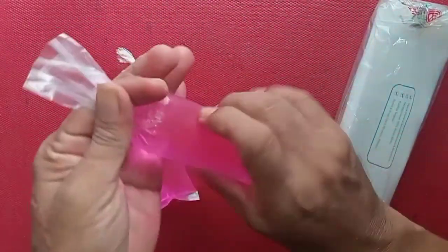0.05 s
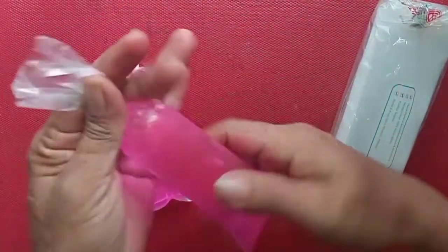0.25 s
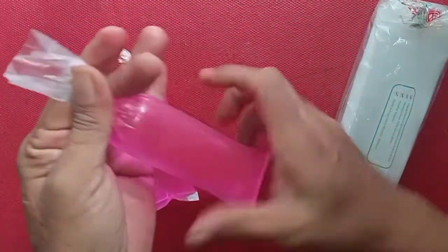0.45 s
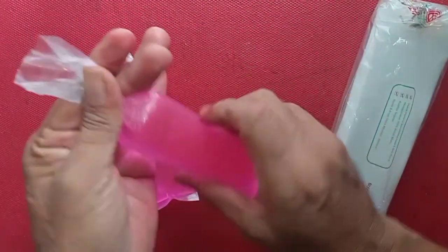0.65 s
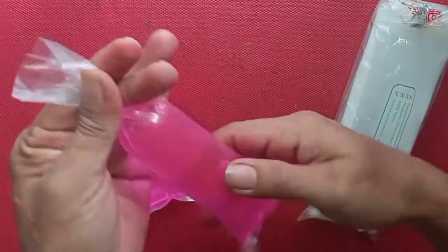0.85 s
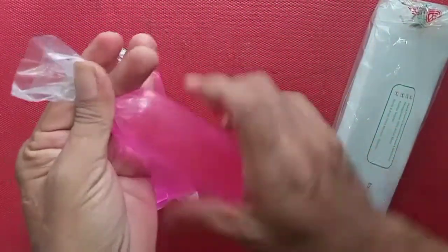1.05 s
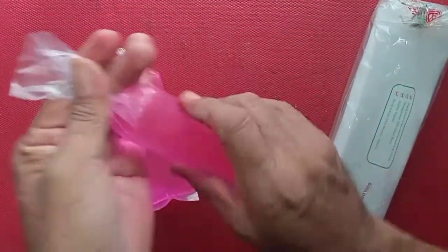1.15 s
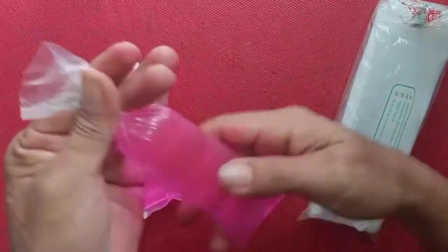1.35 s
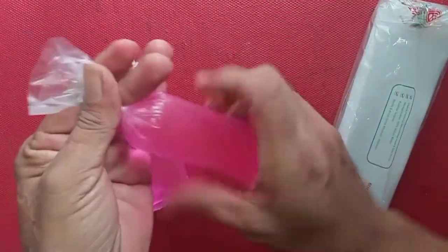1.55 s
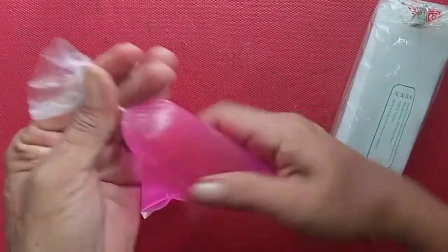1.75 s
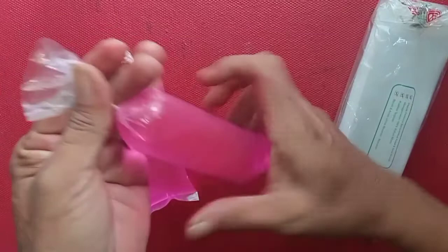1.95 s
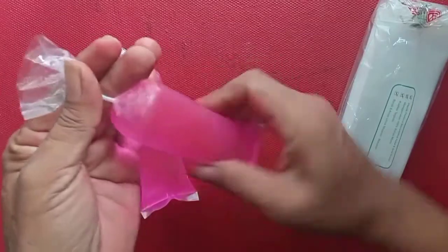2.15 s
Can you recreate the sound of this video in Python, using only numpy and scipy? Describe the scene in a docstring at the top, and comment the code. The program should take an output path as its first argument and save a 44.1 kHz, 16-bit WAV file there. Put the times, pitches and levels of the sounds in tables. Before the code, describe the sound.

Fingers squeak on a small plastic bag of liquid, close by. Five short, high, falling chirps come at about 0.2, 0.7, 1.0, 1.2 and 1.5 seconds. Quieter bubble blips, light plastic ticks and a soft rustle run between them, with blips and ticks bunching from about 1.7 to 2 seconds. Underneath is the faint hum and hiss of a quiet room.

```python
"""A hand squeezes and strokes a small plastic bag of liquid, close by in a quiet room with hum and hiss.
At first a faint ring dies away, the film ticks and bubbles blip as air pockets resonate in the liquid.
From 0.2 to 1.5 s come five short falling chirps, probably fingers in stick-slip on the taut film,
which slightly overload the input. Bubbles, ticks and a soft rustle go on between them and to the end."""
import sys
import numpy as np
from scipy import signal
from scipy.fft import rfft, irfft
from scipy.io import wavfile

SR = 44100
rng = np.random.default_rng(int(sys.argv[2]) if len(sys.argv) > 2 else 0)


def file_out(sig):
    """Save sig as 16-bit WAV at sys.argv[1]."""
    # one column per channel
    cols = np.atleast_2d(sig).T
    # limit, then scale
    lim = np.clip(cols, -1, 1)
    pcm = np.round(lim * 32767).astype(np.int16)
    wavfile.write(sys.argv[1], SR, pcm)


N = 97020

# Spectrum of the film's snaps and clicks. Each row: frequency in Hz, relative density in dB.
SNAP_SPECTRUM = [(60, -6), (400, -12), (1200, 8), (4500, 3.5), (9000, 2.5), (16000, -8.5)]


def squeaks():
    """Stick-slip friction: slips are short, high and rough at first, then longer, lower and purer."""
    # Each row: start in seconds, length in seconds, level in dB, settled pitch in Hz,
    # fall time in seconds, lowest pitch as a ratio of the settled one.
    strokes = [(0.2026, .043, -19.5, 1811, .026, 1), (0.689, .044, -21, 1779, 0.01913, .94),
               (1.0176, 0.048, -20.5, 1782, .020, 0.91), (1.155, 0.049, -21.5, 1744, 0.0159, 0.92),
               (1.461, 0.052, -20.5, 1864, 0.021, 0.84)]
    # An earlier squeak still dying away: pitch in Hz, level in dB, 60 dB decay time in seconds.
    opening_ring = (1905, -44, 0.2)
    attack_s, release_s = 0.0055, 0.009
    start_ratio, high_ratio, drop_s, settle_s = 1.2, 1.12, 0.00588, 0.009
    first_slip_s, last_slip_s, slowing_s, slip_jitter = 0.0035, 0.013, 0.03, 0.241
    swell_share, pitch_scatter = 0.58, 0.022
    rough_start, rough_held, rough_s, rough_hz = 0.38, 0.05, 0.032, 540  # the grip chatters at first
    ring_db, rub_db = -22.5, -34.5  # relative to the squeak
    radiating_band_hz = [1373, 3130]
    t = np.arange(SR // 8) / SR
    out, pressure = np.zeros((2, N))
    rub = crackle(per_s=2800)
    for start, length, db, hz, fall, dip in strokes:
        rough_sin, rough_cos, drift = (wander(r)[:len(t)] for r in (rough_hz, rough_hz, 1 / last_slip_s))
        slip_s = np.interp(t, [0, slowing_s], [first_slip_s, last_slip_s]) * np.exp(slip_jitter * drift)
        slip, within = np.divmod(np.cumsum(1 / slip_s) / SR, 1)
        detune, phase_jump = rng.standard_normal((2, len(t)))[:, slip.astype(int)]  # one draw a slip
        swell = np.sin(np.pi / 2 * np.minimum(within, 1 - within) / swell_share)
        ratio = np.interp(t, [0, fall - drop_s, fall, fall + settle_s], [start_ratio, high_ratio, dip, 1])
        phase = 2 * np.pi * np.cumsum(hz * ratio * (1 + pitch_scatter * detune)) / SR + phase_jump
        roughness = rough_held + (rough_start - rough_held) * np.exp(-(t / rough_s) ** 2)
        chatter = roughness * (rough_sin * np.sin(phase) + rough_cos * np.cos(phase)) / 2
        level = amp(db) * np.minimum(t / attack_s, 1) * np.exp(-np.maximum(t - length, 0) / release_s)
        add(out, start, level * (swell * np.sin(phase) + chatter))
        add(pressure, start, level)
        tail = ring(hz, t60=0.36)  # the bag rings on at the settled pitch
        waver = unit_rms(1 + wander(hz=45))[:len(tail)]
        add(out, start + length, amp(db + ring_db) * tail * waver)
    hz, db, t60 = opening_ring
    add(out, 0, amp(db) * ring(hz, t60))
    band = signal.butter(2, radiating_band_hz, "bandpass", fs=SR, output="sos")
    return signal.sosfilt(band, out) + amp(rub_db) * pressure * rub


def liquid():
    """Bubble resonance: single clear blips stand over a patter of faint ones."""
    # Each row: start in seconds, level in dB, pitch in Hz, 60 dB decay time in seconds,
    # glide as a share of the pitch per second.
    blips = [(.105, -48.5, 953, 0.023, 1), (0.169, -44.5, 1206, 0.022, -1), (.194, -41.5, 913, 0.11, 3),
             (.329, -44.5, 1206, 0.047, 1), (0.344, -44, 986, 0.13, 1), (.388, -42.5, 970, 0.031, -1),
             (0.402, -42, 1258, 0.041, -2), (.539, -41, 1020, 0.076, 1.2), (.683, -32.5, 1075, 0.017, 15),
             (.787, -49.5, 1027, 0.057, 1), (.962, -37, 890, 0.033, -2), (1.011, -51, 564, 0.15, 0.5),
             (1.107, -35, 774, 0.05, 1.5), (1.334, -36.5, 1177, 0.059, 9.5), (1.632, -43, 926, 0.074, 1.5),
             (1.733, -38, 1120, 0.06, 7), (1.784, -36.5, 1054, 0.043, -0.5), (1.804, -39, 1208, 0.061, 0),
             (1.843, -41.5, 883, 0.072, -8.5), (1.906, -39, 1219, 0.051, -5), (2.033, -33, 974, 0.024, 5),
             (2.169, -45, 918, 0.073, -0.5)]
    patter = [bubble(hz, t60=0.034, glide=1.73) for hz in np.geomspace(750, 1800, 12)]
    out = amp(-61) * scatter(patter, per_s=260)
    for start, db, hz, t60, glide in blips:
        add(out, start, amp(db) * bubble(hz, t60, glide))
    return out


def bubble(hz, t60, glide, rise_s=0.0036):
    """An air pocket is a damped oscillator whose pitch slides as it changes shape."""
    t = np.arange(SR // 8) / SR
    level = np.minimum(t / rise_s, 1) * amp(-60 * np.maximum(t - rise_s, 0) / t60)
    return level * np.sin(2 * np.pi * hz * (t + glide * t ** 2 / 2))


def film():
    """Impulse excitation: each tick is a broadband snap and a brief ring, over a faint crinkle."""
    # Each row: start in seconds, level in dB, ring pitch in Hz, snap relative to the ring in dB,
    # left over right in dB.
    ticks = [(0.086, -57, 3240, 6, 2.5), (0.104, -35.5, 1730, -24, 0.5), (0.146, -41, 2800, -17, 4),
             (0.288, -52, 8640, 3.5, -2), (.345, -41, 2720, -11, -1), (0.4714, -32, 4367, -27, 7),
             (.478, -37.5, 2040, -6.5, -4), (1.259, -41, 2800, -12, 0), (1.311, -43.5, 4600, -21, 0),
             (1.4, -36.5, 2180, -16, -5.5), (1.414, -45.5, 3950, -13, 2), (1.592, -46.5, 4670, -25, -1),
             (1.6786, -39, 3100, -12, .5), (1.74, -51.5, 3030, 5.5, 0.5), (1.844, -46, 3530, -1, 0),
             (1.9115, -35.5, 2900, -16.5, -4), (1.915, -40.5, 4900, -9, 3), (1.921, -37, 3300, -23, 3),
             (1.925, -37, 1690, -27, 0), (1.980, -42, 1868, -6.5, 5), (2.034, -47.5, 2180, 2.5, -1),
             (2.048, -60, 2570, 4.5, -11.5)]
    snap_t60 = 0.062
    crinkle = scatter([ring(hz, t60=0.016) for hz in np.geomspace(1500, 3900, 14)], per_s=200)
    out = amp(-64.5) * crinkle + amp(-67.5) * crackle(per_s=120)
    t = np.arange(SR // 5) / SR
    snap_noise = noise(SNAP_SPECTRUM)
    for start, db, hz, snap_db, pan_db in ticks:
        burst = np.roll(snap_noise, -round(start * SR), axis=1)[:, :len(t)]
        snap = amp(snap_db - 60 * t / snap_t60) * burst
        pan = amp([[pan_db / 2], [-pan_db / 2]])
        add(out, start, amp(db) * (ring(hz, t60=0.013) + snap) * pan)
    return out


def ring(hz, t60):
    """Free vibration: one mode of the film decays by 60 dB in t60 seconds."""
    t = np.arange(SR // 5) / SR
    return amp(-60 * t / t60) * np.sin(2 * np.pi * hz * t)


def crackle(per_s):
    """Shot noise: tiny dry clicks of the film, each with a different strength on the two sides."""
    clicks = (rng.random(N) < per_s / SR) * rng.standard_normal((2, N))
    colour = amp(log_interp(SNAP_SPECTRUM, np.fft.rfftfreq(N, 1 / SR)))
    return unit_rms(irfft(rfft(clicks) * colour, N))


def rustle():
    """Sliding friction: skin and film pass each other with a soft, flickering hiss."""
    # Envelope of the hiss. Each row: time in seconds, relative level in dB.
    envelope = [(0.0, -61), (0.2, -66), (0.22, -47.5), (0.26, -69), (0.46, -71), (0.48, -57), (0.53, -84),
                (0.72, -68), (0.97, -65), (1.04, -52), (1.14, -67), (1.2, -48), (1.23, -64), (1.46, -57.5),
                (1.98, -67), (1.99, -60), (2.14, -62), (2.2, -60)]
    # Colour of the hiss. Each row: frequency in Hz, relative density in dB.
    spectrum = [(100, -26), (600, 2), (2000, 1), (5000, 5), (9000, -0.5), (15000, 1.5)]
    level_db = np.interp(np.arange(N) / SR, *np.transpose(envelope)) - 1.5
    flicker_db = 3 * wander(hz=90)
    return amp(level_db + flicker_db) * noise(spectrum)


def room(x, tail_db, build_s=0.0055):
    """Reverberation: early reflections and a short diffuse tail, nearly the same on both sides."""
    # Reflections from table and walls. Each row: delay in seconds, gain as a ratio.
    echoes = [(.0047, .12), (0.0102, .14), (0.0165, 0.11), (.0265, 0.097)]
    # Reverberation times. Each row: frequency in Hz, 60 dB decay time in seconds.
    decay_times = [(200, 0.12), (1000, 0.11), (2000, 0.24), (5000, 0.073), (14000, 0.33)]
    taps = rng.standard_normal((3, SR // 2))
    hz, t, diffuse = signal.stft(taps[0] + 0.04 * taps[1:], SR, nperseg=256)
    decay = amp(-60 * t / log_interp(decay_times, hz)[:, None])
    tail = signal.istft(diffuse * decay * np.minimum(t / build_s, 1), SR, nperseg=256)[1]
    response = amp(tail_db) * tail / np.linalg.norm(tail[0])
    for delay, gain in echoes:
        add(response, delay, np.array([gain]))
    return x + signal.fftconvolve(x, response, axes=1)[:, :N]


def background():
    """Noise floor: steady hiss, and a low hum whose lines are broadened by random modulation."""
    # Lines of the hum. Each row: frequency in Hz, level in dB, rate of wavering in Hz.
    hum_lines = [(98.8, -72.5, 3.2), (143, -73, 17)]
    # Colour of the steady noise. Each row: frequency in Hz, relative density in dB.
    spectrum = [(20, -12), (50, -20.5), (95, 0.5), (125, -28.5), (166, -15), (259, -28.5), (452, -23),
                (1010, -16), (1400, -20.5), (1900, -17), (3850, -23.5), (12400, -29), (14300, -29),
                (15500, -51)]
    t = np.arange(N) / SR
    hum = np.zeros(N)
    for hz, db, waver_hz in hum_lines:
        tone = np.sin(2 * np.pi * hz * t + 0.6 * wander(waver_hz))
        hum += amp(db) * unit_rms(tone * (1 + 0.2 * wander(waver_hz)))
    return amp(-58) * noise(spectrum) + hum


def noise(spectrum):
    """Partial coherence: coloured stereo noise, alike in the bass and unrelated in the treble."""
    # Each row: frequency in Hz, left-right correlation as a ratio.
    coherence = [(30, .97), (300, 1), (1500, 0.5), (3000, 0.2), (6000, 0.05), (15000, 0.0453)]
    hz = np.fft.rfftfreq(N, 1 / SR)
    left, independent = rfft(rng.standard_normal((2, N)))
    likeness = np.clip(log_interp(coherence, hz), -1, 1)
    right = likeness * left + np.sqrt(1 - likeness ** 2) * independent
    return unit_rms(irfft(np.array([left, right]) * amp(log_interp(spectrum, hz)), N))


def scatter(grains, per_s, spread_db=6.5):
    """A Poisson process: grains sound at random times and strengths."""
    out = np.zeros(N)
    for grain in grains:
        sizes = amp(spread_db * np.minimum(rng.exponential(1, N), 3))
        onsets = rng.random(N) < per_s / len(grains) / SR
        out += signal.oaconvolve(sizes * onsets, grain)[:N]
    return unit_rms(out)


def wander(hz):
    """Low-pass noise of rms 1, fluctuating up to about the given rate."""
    lowpass = np.exp(-0.5 * (np.fft.rfftfreq(N, 1 / SR) / hz) ** 2)
    return unit_rms(irfft(rfft(rng.standard_normal(N)) * lowpass, N))


def amp(db):
    """Decibels to amplitude ratio."""
    return 10 ** (np.asarray(db) / 20)


def unit_rms(x):
    """Normalisation to rms 1."""
    return x / np.sqrt(np.mean(abs(x) ** 2) + 1e-20)


def log_interp(points, hz):
    """Interpolation on a log-frequency axis."""
    f, value = np.transpose(points)
    return np.interp(np.log(hz + 1), np.log(f + 1), value)


def add(mix, start_s, sound):
    """Superposition of a sound on the mix at a given time."""
    part = mix[..., max(round(start_s * SR), 0):][..., :sound.shape[-1]]
    part += sound[..., :part.shape[-1]]


def scene():
    """Superposition: film and liquid reverberate in the room, over rustle and background."""
    bag = room(squeaks() + film(), tail_db=-10.5)
    bubbles = room(liquid()[None], tail_db=-11)
    return bag + bubbles + rustle() + background()


def record(dry):
    """Saturation: the input rounds off the loudest peaks, then a low-pass limits the band."""
    ceiling_db, knee, cutoff_hz = -23, 11, 15550
    rounded = dry / (1 + abs(dry / amp(ceiling_db)) ** knee) ** (1 / knee)
    lowpass = signal.firwin(511, cutoff_hz, window=("kaiser", 9), fs=SR)
    return signal.oaconvolve(rounded, lowpass[None], "same")


dry = scene()
out = record(dry)
file_out(out)
```